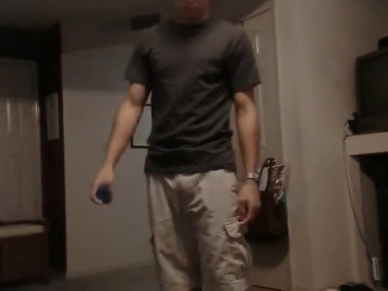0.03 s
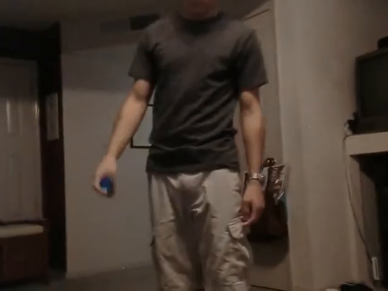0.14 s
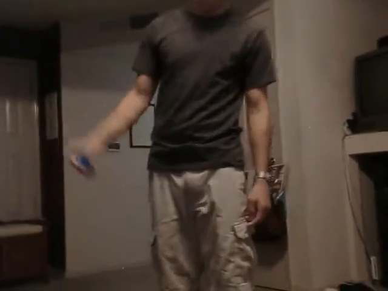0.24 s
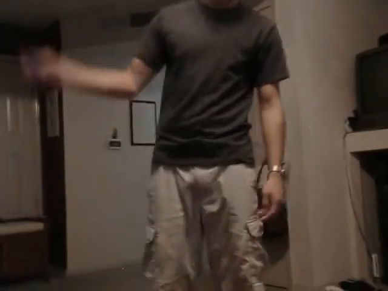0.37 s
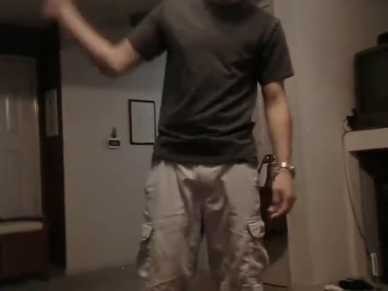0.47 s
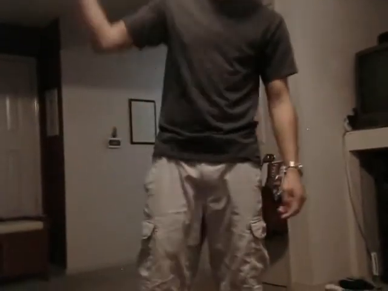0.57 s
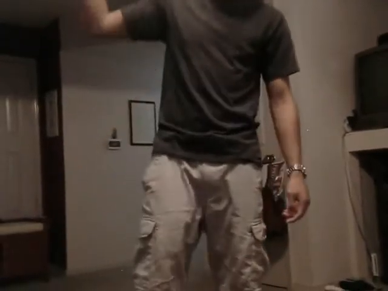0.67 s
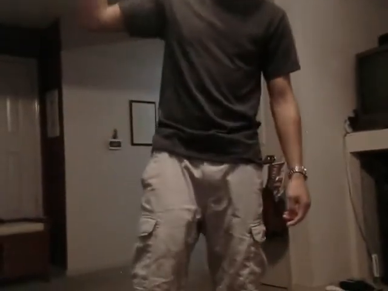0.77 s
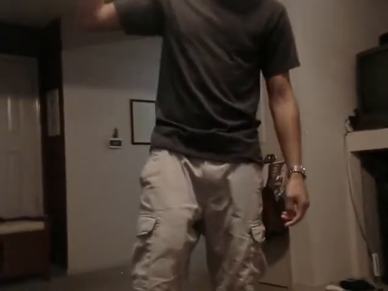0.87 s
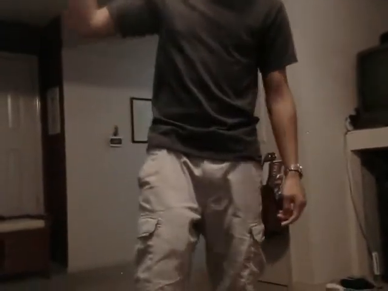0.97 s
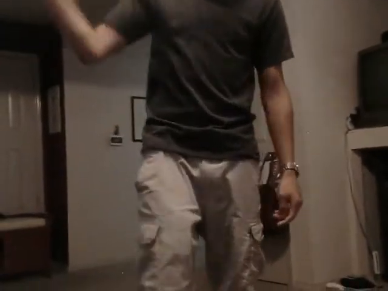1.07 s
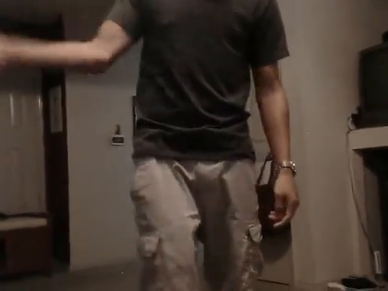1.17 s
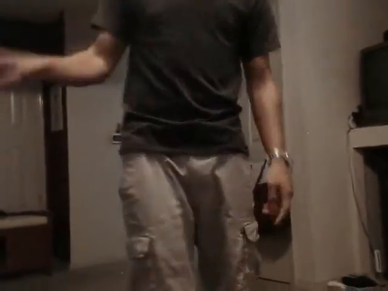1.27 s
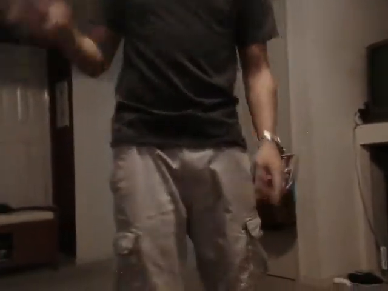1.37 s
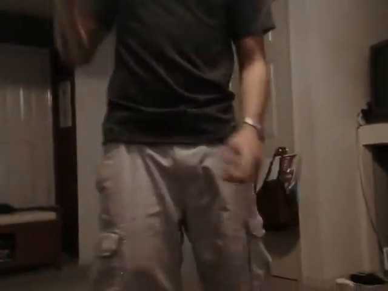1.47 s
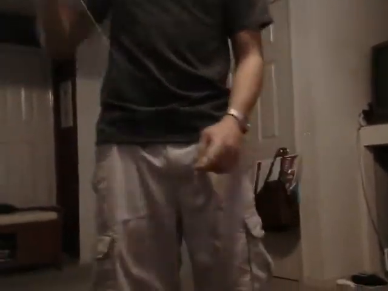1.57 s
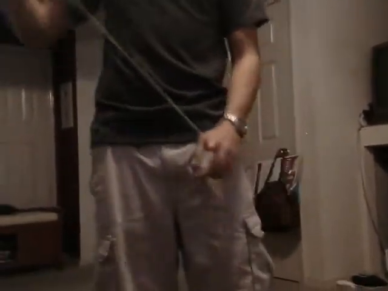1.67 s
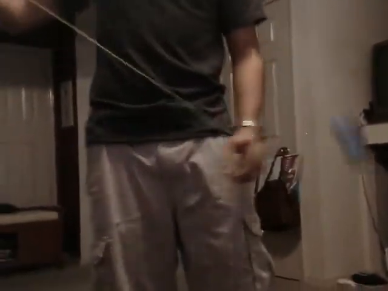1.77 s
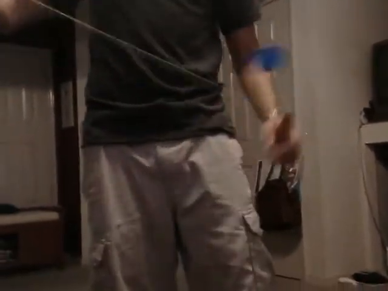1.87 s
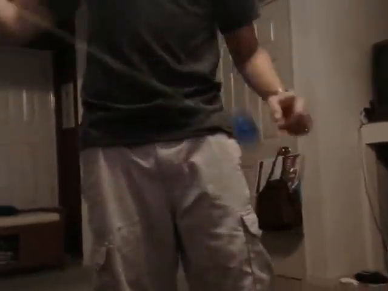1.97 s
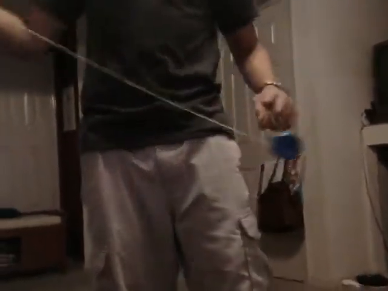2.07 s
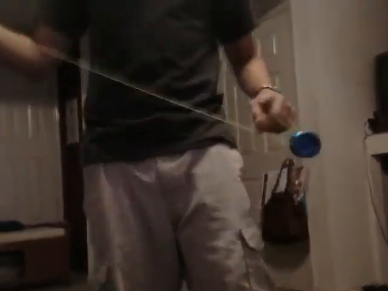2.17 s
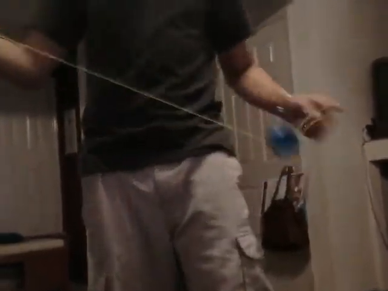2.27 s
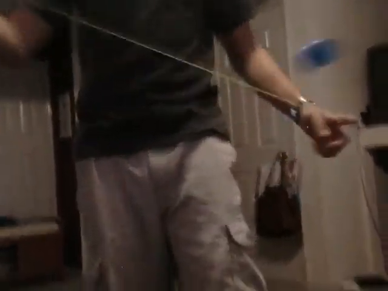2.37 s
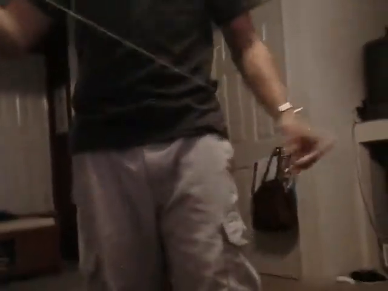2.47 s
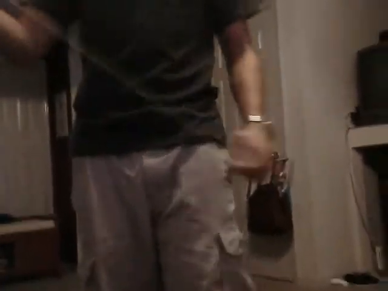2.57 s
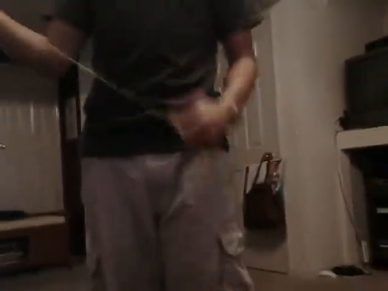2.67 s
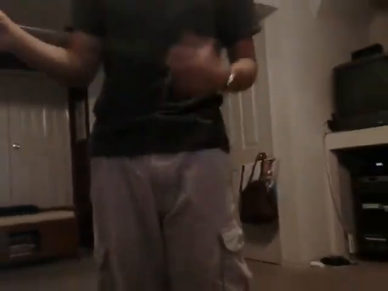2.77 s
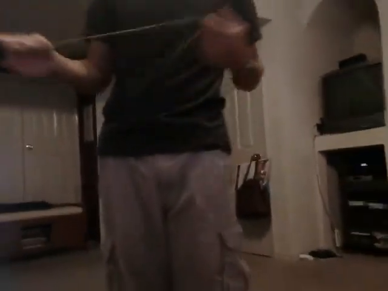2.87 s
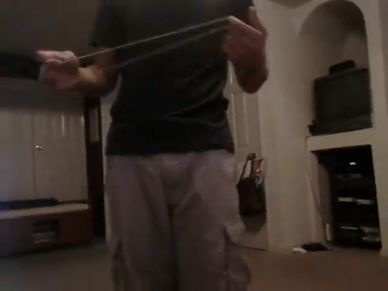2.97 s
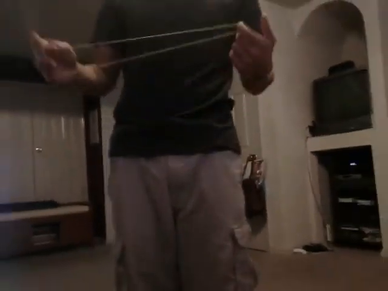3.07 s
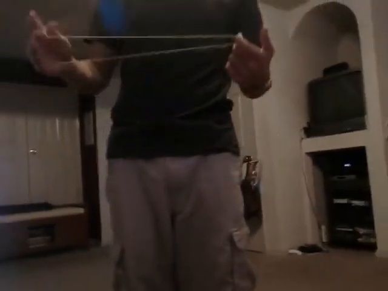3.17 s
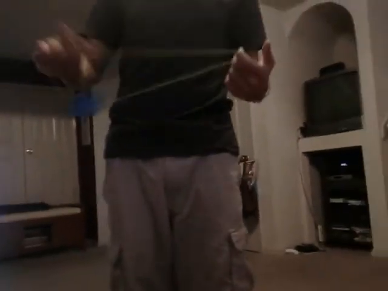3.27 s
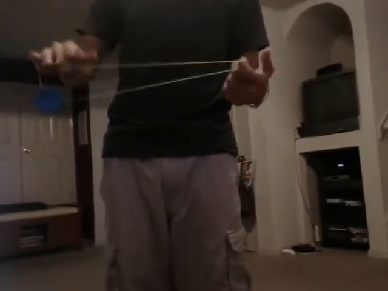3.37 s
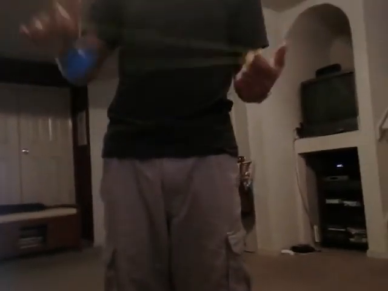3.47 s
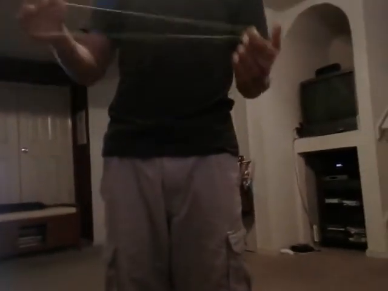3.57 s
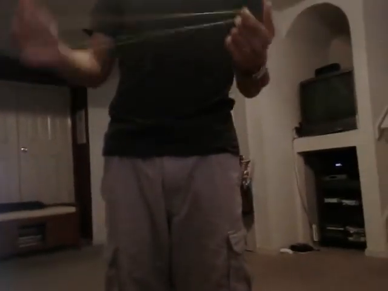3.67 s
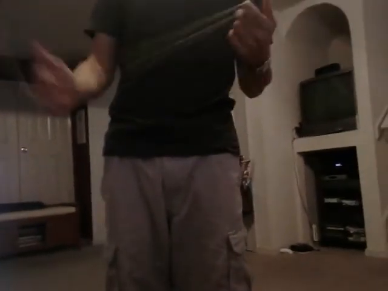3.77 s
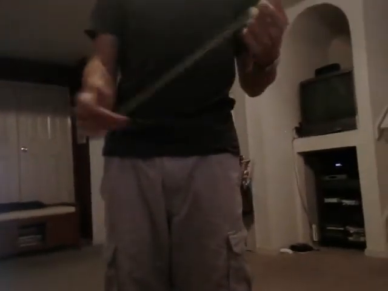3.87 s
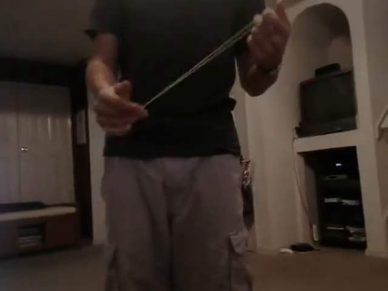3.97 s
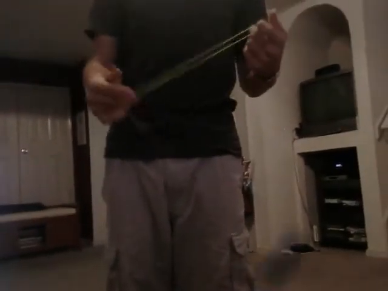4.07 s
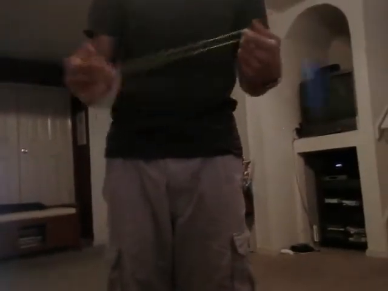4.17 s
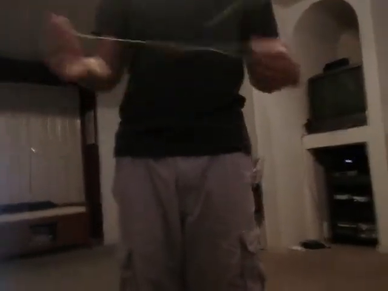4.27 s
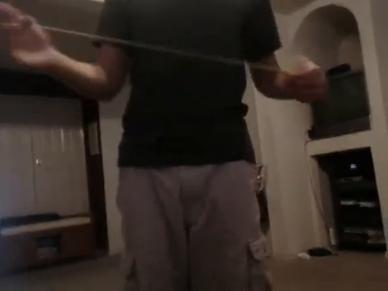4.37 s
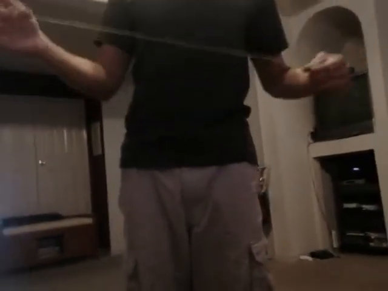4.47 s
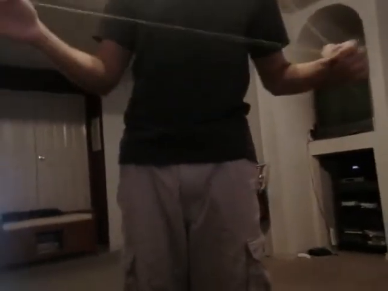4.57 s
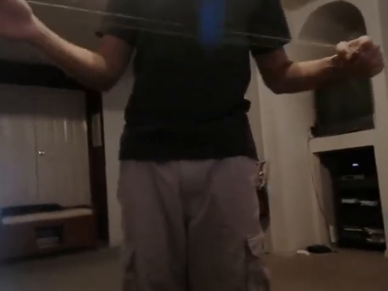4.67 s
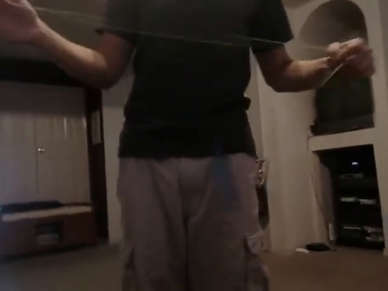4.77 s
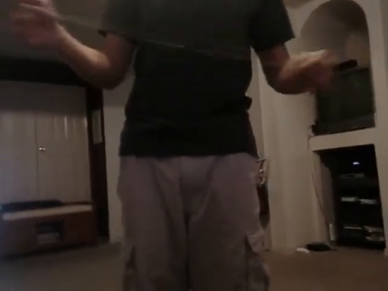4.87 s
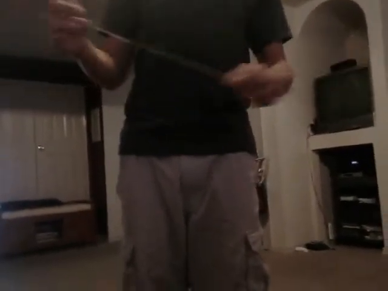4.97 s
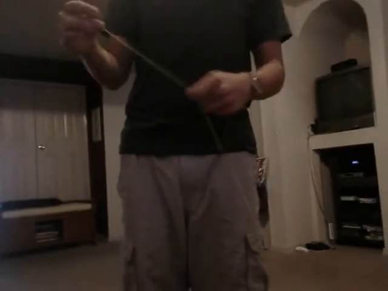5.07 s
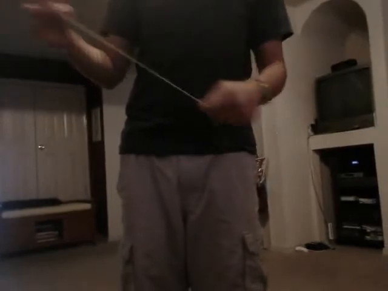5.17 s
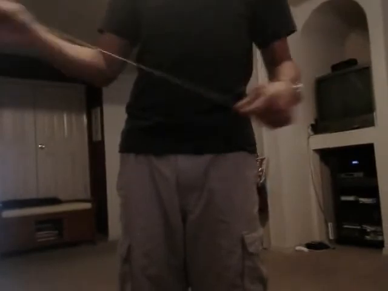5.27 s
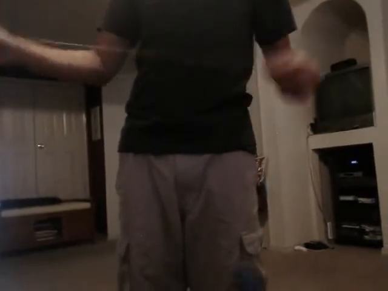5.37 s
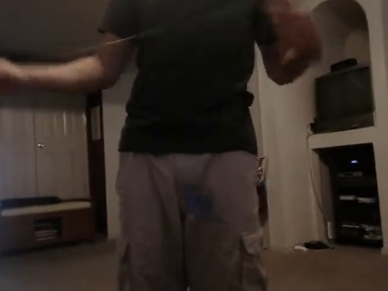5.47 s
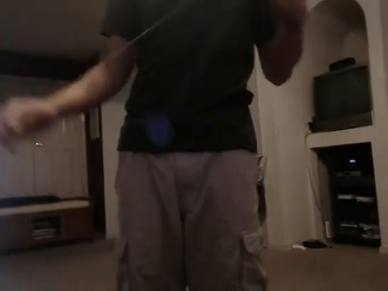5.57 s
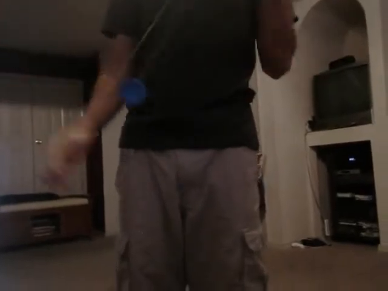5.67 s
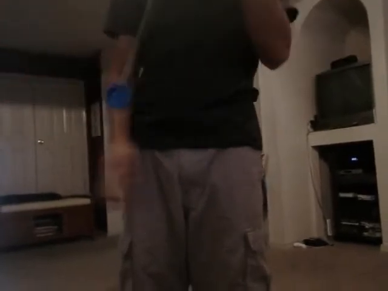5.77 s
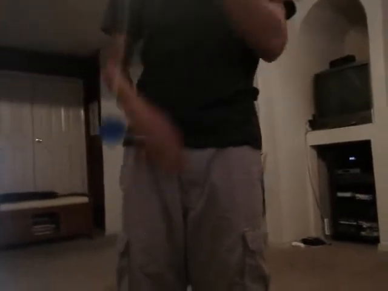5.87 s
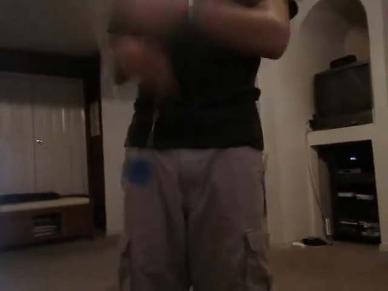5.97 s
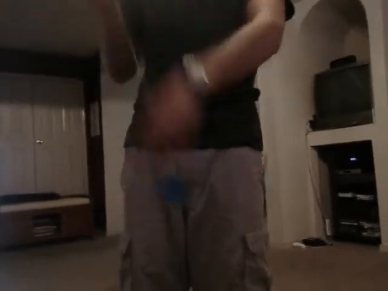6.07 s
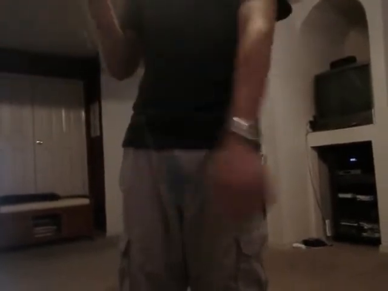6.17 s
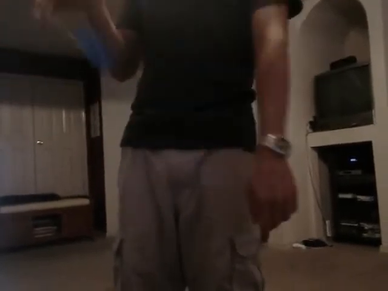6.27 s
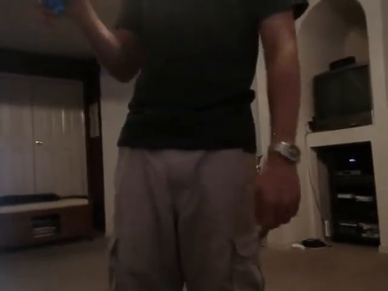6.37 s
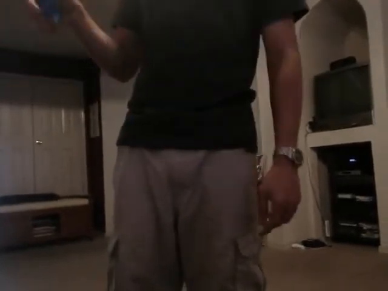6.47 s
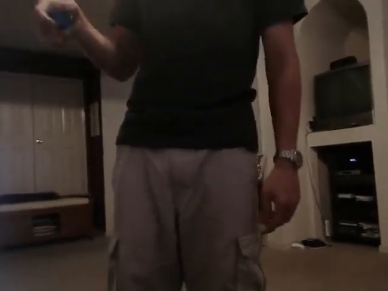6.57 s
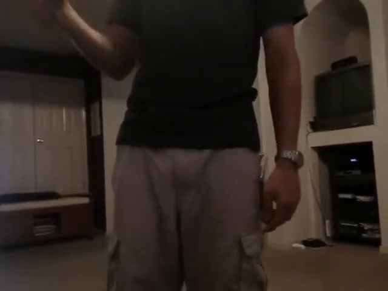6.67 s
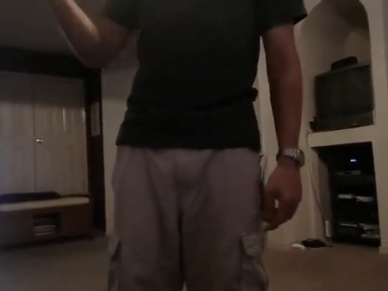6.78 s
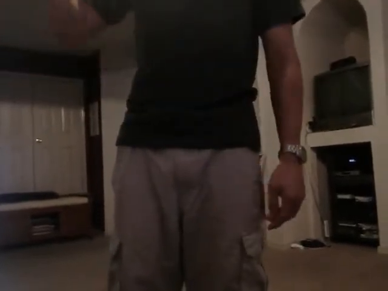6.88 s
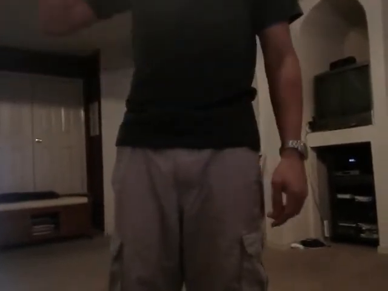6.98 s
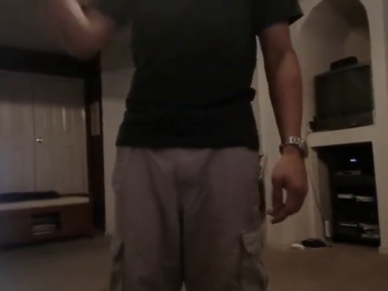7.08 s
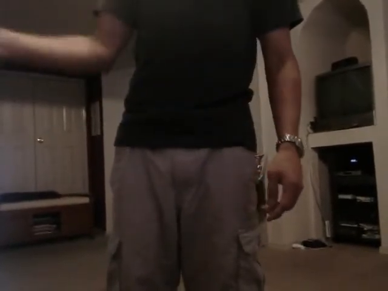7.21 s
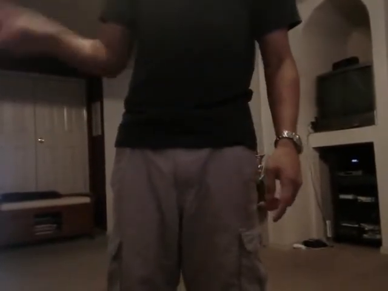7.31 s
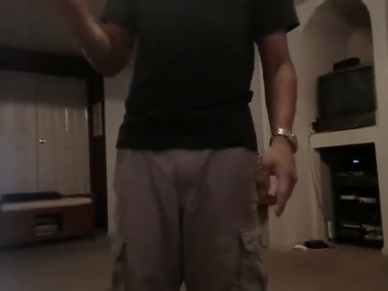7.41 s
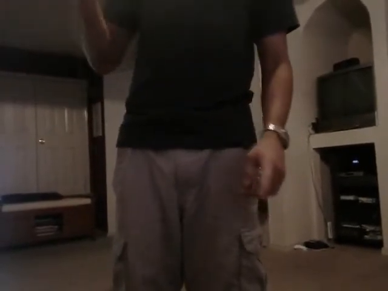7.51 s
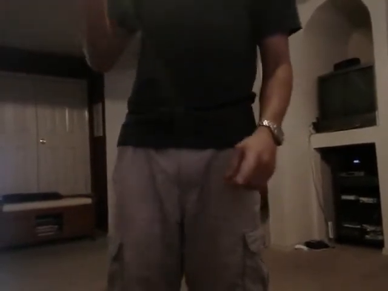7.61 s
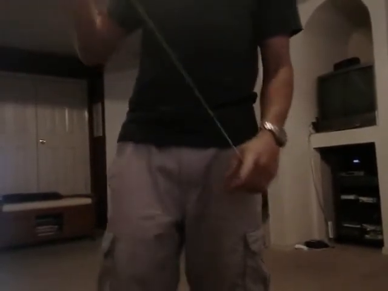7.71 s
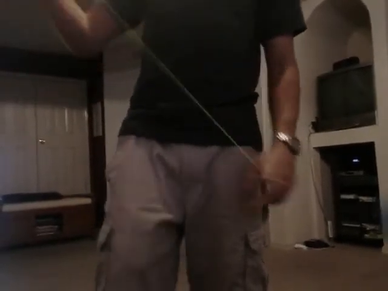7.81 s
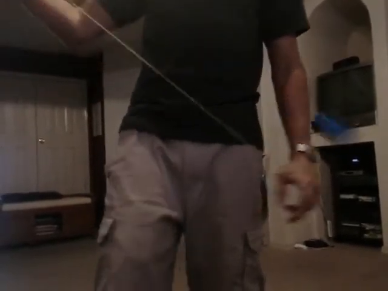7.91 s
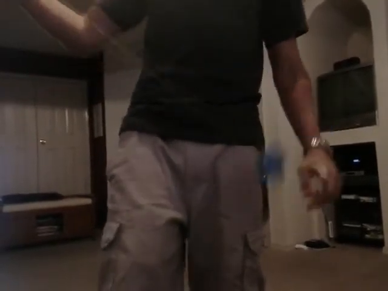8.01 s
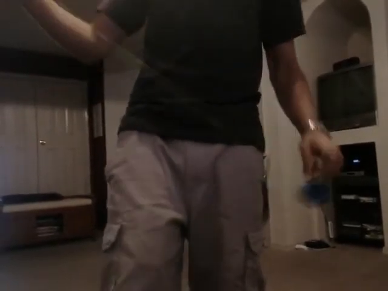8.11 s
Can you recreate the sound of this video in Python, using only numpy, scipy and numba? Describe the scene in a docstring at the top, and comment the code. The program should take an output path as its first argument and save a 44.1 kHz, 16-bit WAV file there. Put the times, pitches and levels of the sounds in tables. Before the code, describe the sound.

Thin whirring of a spinning yo-yo swells and fades indoors, with hissing string, scattered ticks, a snap and a slap.

```python
"""In a quiet carpeted room a metal yo-yo is thrown, spins on its string through swings and hops, is
wound back and thrown again. The ball bearing drives the two halves at their natural frequencies, and
vortices shed from the rims whir. The string hisses by friction, and ticks, slaps and snaps on impact.
Hand movements push puffs of air at a small mono microphone."""
import sys
import numpy as np
from scipy import signal
from scipy.fft import rfft, irfft
from scipy.io import wavfile
from numba import njit

SR = 44100
rng = np.random.default_rng(int(sys.argv[2]) if len(sys.argv) > 2 else 0)


def unload_wav(signal):
    """Save mono or channel-first audio to the path in sys.argv[1] as 16-bit WAV at rate SR, clipped to [-1, 1]."""
    wavfile.write(
        sys.argv[1],
        SR,
        np.round(np.clip(np.atleast_2d(signal).T, -1, 1) * 32767).astype(np.int16),
    )


N = 359318


def amp(db):
    return 10 ** (np.asarray(db) / 20)


def rms_one(x):
    return x / np.sqrt(np.mean(x ** 2) + 1e-20)


def in_time(rows):
    """Linear interpolation: one curve for each column after the time."""
    times, *columns = np.transpose(rows)
    return [np.interp(np.arange(N) / SR, times, column) for column in columns]


def gate(start, end, rise_db_per_s, fall_db_per_s):
    """Exponential growth up to start, unit gain until end, then exponential decay."""
    t = np.arange(N) / SR
    loss_db = rise_db_per_s * np.maximum(start - t, 0) + fall_db_per_s * np.maximum(t - end, 0)
    return amp(-np.minimum(loss_db, 200))


def drift(hz):
    """Low-pass noise: a slow random fluctuation of unit rms."""
    r = np.exp(-2 * np.pi * hz / SR)
    return rms_one(signal.lfilter([1], [1, -2 * r, r * r], rng.standard_normal(N + SR))[SR:])


def grains(per_s, spread_db):
    """Shot noise: random impulses of uneven size and sign, at unit rms."""
    sizes = amp(spread_db * np.minimum(rng.exponential(1, N), 5)) * rng.choice([-1, 1], N)
    return rms_one(sizes * (rng.random(N) < per_s / SR))


def ring(x, hz, t60):
    """Damped oscillator: a unit impulse excites a decaying sine of unit amplitude."""
    r, w = amp(-60 / (t60 * SR)), 2 * np.pi * min(hz, .45 * SR) / SR
    return signal.lfilter([0, np.sin(w)], [1, -2 * r * np.cos(w), r * r], x + 1e-18)


@njit
def glide(x, cosine, r):
    """Two-pole resonator with a variable centre frequency."""
    y = np.zeros(len(x))
    for i in range(2, len(x)):
        y[i] = x[i] - x[i - 2] + 2 * r * cosine[i] * y[i - 1] - r * r * y[i - 2]
    return y


def moving_band(x, hz, width_hz):
    """Two variable resonators in cascade give a band with steep skirts, at unit rms."""
    cosine, r = np.cos(2 * np.pi * hz / SR), np.exp(-np.pi * width_hz / SR)
    return rms_one(glide(glide(x, cosine, r), cosine, r))


def burst(s, db, ms, bands):
    """Transient response: a sharp front and a dying crackle excite a small radiator's resonances."""
    out, t, onset = np.zeros(N), np.arange(4000) / SR, round(s * SR)
    force = rng.standard_normal(len(t)) * np.exp(-(1000 * t / ms) ** 4)
    force[0] = 1.4
    drive = np.diff(force, prepend=0)   # a small source radiates little bass
    for hz, width_hz, band_db in bands:
        t60 = np.log(1000) / (np.pi * width_hz)
        sound = ring(ring(drive, hz, t60), hz, t60 / 2)
        out[onset:onset + len(t)] += amp(db + band_db) * sound[:N - onset] / np.abs(sound).max()
    return out


# Room tone and microphone self-noise: f/Hz, relative spectral level/dB
ROOM_SPECTRUM = [(12, -44), (20, -2), (42, -7.5), (70, -2.5), (113, -3), (208, -8), (283, -7.5),
                 (523, -14.5), (584, -16), (1210, -20), (3110, -25.5), (3890, -26.5), (15700, -29)]
def room_tone():
    """Spectrally shaped Gaussian noise, its lows slowly modulated in amplitude."""
    hz = np.arange(N // 2 + 1) * SR / N + 1
    knots_hz, knots_db = np.transpose(ROOM_SPECTRUM)
    shape = amp(np.interp(np.log(hz), np.log(knots_hz), knots_db))
    noise = rms_one(irfft(rfft(rng.standard_normal(N)) * shape, N))
    lows = signal.sosfilt(signal.butter(2, 90, fs=SR, output="sos"), noise)
    return amp(-49.5) * (noise + lows * (amp(3.5 * drift(1.4)) - 1))


# Air pushed by the hands: t/s, relative level/dB, half-height width/ms, sign (push +1, pull -1)
AIR_PUFFS = [(1.201, -42, 6.7, -1), (2.194, -39.5, 4.9, 1), (2.454, -44, 4.1, 1), (3.676, -43, 7.7, -1),
             (3.774, -41.5, 4.3, 1), (4.405, -38, 7.7, -1), (4.469, -35, 3.5, -1), (4.528, -42, 2, 1),
             (4.582, -37.5, 3.7, -1), (5.039, -41, 3.6, -1), (5.529, -39, 5.7, -1), (5.569, -46, 2.5, -1),
             (5.617, -39.5, 4.6, -1), (6.361, -41.5, 8.3, -1), (6.557, -39.5, 4.3, 1), (6.618, -32, 2.8, 1),
             (7.556, -44, 3.9, 1)]
def puffs():
    """Gaussian pressure pulses swing back as the microphone's vent equalises the pressure."""
    t, pressure = np.arange(N) / SR, np.zeros(N)
    for s, db, ms, sign in AIR_PUFFS:
        pressure += sign * amp(db + 6.5) * np.exp(-np.log(16) * (1000 * (t - s) / ms) ** 2)
    return signal.sosfilt(signal.butter(2, 25, "high", fs=SR, output="sos"), pressure)


# The string brushes a rim: t/s, peak level/dB, duration/ms
RIM_PINGS = [(4.675, -45.5, 30), (6.02, -48, 15), (6.322, -40, 7), (7.226, -47, 20), (7.252, -47, 3),
             (7.27, -46, 56), (7.985, -51, 30), (8.1, -57, 45)]
def pings():
    """Light contact excites one narrow, high resonance."""
    hz, width_hz = 8290, 100
    return sum(burst(s, db, ms, [(hz, width_hz, 0)]) for s, db, ms in RIM_PINGS)


# Thud resonances: f/Hz, bandwidth/Hz, gain/dB
THUD_BANDS, THUD_MS = [(596, 670, -0.48), (1480, 1000, -0.56)], 45
# The string jerks taut or the palm closes: t/s, level/dB
JERKS = [(1.412, -43.5), (6.119, -36.5)]
def thuds():
    """Sudden deceleration excites low, heavily damped resonances."""
    return sum(burst(s, db, THUD_MS, THUD_BANDS) for s, db in JERKS)


# Modes of the halves: f/Hz, T60/s, gain/dB when rolled, when dragged, when knocked
MODES = [(1452, 0.31, -6.5, -16, -32), (1580, 0.2, -4, -23, -25), (3548, 0.09, -29, -7.5, -21),
         (3560, 0.071, -16, -7, -13), (6744, 0.024, 4, -26, -22), (8350, 0.12, -28, -25, -32),
         (13000, 0.015, 3, -32, -30)]
def knocked_halves(contacts):
    """Free vibration: each impulse leaves the modes ringing."""
    knocks = np.zeros(N)
    for s, db, _, coupling_db in contacts:
        knocks[round(s * SR)] += amp(db + coupling_db)
    return sum(amp(db) * ring(knocks, hz, t60) for hz, t60, *_, db in MODES)


def dragged_halves(force):
    """Forced vibration: white noise of unit rms drives each mode to an rms set by its gain."""
    return sum(amp(db) * ring(force, hz, t60) * np.sqrt(4 * np.log(1000) / (t60 * SR))
               for hz, t60, _, db, _ in MODES)


# Ticks of string and fingers: t/s, peak level/dB, f/Hz, coupling to the halves/dB
STRING_TICKS = [(0.376, -41, 3700, -22), (1.1255, -40, 11000, 0), (1.1885, -34, 7000, -7),
                (1.224, -29, 5130, -10), (1.372, -46, 7000, -14), (2.166, -42, 4500, -22),
                (2.171, -31, 5000, -16), (2.2277, -27.5, 4000, -28), (2.25, -28, 12500, -17),
                (2.3033, -30.5, 2320, -24), (4.3615, -33.5, 1770, -24), (4.3719, -36.5, 3000, -22),
                (4.73, -32, 12100, -17), (5.42, -34, 13000, -8), (6.067, -35, 9000, 4),
                (6.11, -40, 7000, -15), (7.171, -38, 9050, -10), (7.193, -34, 9000, -12),
                (7.205, -36, 6600, -24), (7.2255, -33.5, 9900, -8), (7.2518, -32, 8500, -5),
                (7.305, -36, 9000, -8)]
def ticks():
    """Brief impacts radiate broadband clicks and knock the halves."""
    clicks = sum(burst(s, db, ms=1, bands=[(hz, 0.76 * hz, 0)]) for s, db, hz, _ in STRING_TICKS)
    return clicks + knocked_halves(STRING_TICKS)


# Slap resonances: f/Hz, bandwidth/Hz, gain/dB
SLAP_BANDS = [(1160, 1130, -8.5), (2920, 4100, 3), (8660, 9100, -4)]
# The yo-yo hits string or palm: t/s, level/dB, duration/ms, coupling to the halves/dB
SLAP_HITS = [(4.2614, -25, 1.4, -25), (4.2639, -17.5, 5.7, -26), (6.117, -33, 2.2, 5),
             (6.1265, -32, 2.1, 8.5), (6.3175, -36.5, 12, 5)]
def slaps():
    """Longer impacts crackle through three broad resonances and knock the halves."""
    return sum(burst(s, db, ms, SLAP_BANDS) for s, db, ms, _ in SLAP_HITS) + knocked_halves(SLAP_HITS)


# Snap resonances: f/Hz, bandwidth/Hz, gain/dB
SNAP_BANDS = [(6170, 3200, 0.4), (5200, 620, -23), (6550, 880, -19)]
def snap(s=3.6744, tail_lag_s=0.003):
    """Sudden release of tension: the string leaves a finger with an impulse and a short crackle."""
    crack = burst(s, db=-4, ms=.015, bands=SNAP_BANDS)
    return crack + burst(s + tail_lag_s, db=-17, ms=1.15, bands=[(4940, 6700, 0)])


# String winding on or off the axle: t/s, duration/s, drag level/dB, rustle level/dB
WINDS = [(1.125, .27, -58.5, -59), (1.23, 0.0072, -55.5, -55), (5.7, 0.084, -65, -64),
         (5.965, 0.065, -51, -50), (6.12, 0.0058, -41.5, -48), (6.206, 0.17, -62, -67),
         (7.115, 0.15, -63, -57.5), (7.308, 0.066, -58.5, -58), (7.93, 0.17, -59, -58)]
def winding():
    """Stick-slip friction on the inner walls makes the halves whine and the fibres rustle."""
    gates = np.array([gate(s, s + length, rise_db_per_s=700, fall_db_per_s=247)
                      for s, length, *_ in WINDS])
    *_, drag_db, rustle_db = np.transpose(WINDS)
    slips = grains(4000, spread_db=2.2) * amp(2.5 * drift(45))
    rustle = moving_band(slips, np.full(N, 8000.), width_hz=9500)
    return dragged_halves(amp(drag_db) @ gates * slips) + amp(rustle_db) @ gates * rustle


# Free spins: start t/s, end t/s, song level/dB, hum level/dB, gap whistle re upper whir band/dB
FREE_SPINS = [(1.374, 4.23, -60.0, -66.5, -9.5), (4.3, 6.0, -59.5, -69, -20), (7.4, 8.2, -59.5, -64.0, -6)]
def spinning(levels_db=0):
    """Amplitude envelope that opens for each free spin, at that spin's level."""
    gates = [gate(start, end, rise_db_per_s=300, fall_db_per_s=250) for start, end, *_ in FREE_SPINS]
    return np.sum(amp(levels_db) * np.transpose(gates), axis=1)


# String running over axle and fingers: t/s, level/dB, f/Hz
STRING_RUB = [(1.33, -65, 7950), (1.37, -62, 7660), (1.45, -56.5, 9100), (2.81, -59.5, 8200),
              (2.88, -55.5, 9800), (2.99, -59.5, 7600), (3.4, -51, 9700), (3.65, -57, 9400),
              (3.71, -55, 8500), (4.228, -59, 8500), (4.245, -71, 8400), (4.295, -66, 8130),
              (4.439, -55.5, 8550), (4.613, -62.5, 7900), (4.795, -52, 9750), (5.085, -61.5, 9530),
              (5.199, -55.5, 10000), (5.487, -54.5, 8920), (5.695, -59.5, 8700), (5.909, -50, 8600),
              (5.973, -66, 8340), (6.08, -49, 9140), (7.36, -65, 8300), (7.534, -59, 9060),
              (7.732, -59.5, 8410), (7.758, -57.5, 9550), (8.148, -55.5, 8200)]
def string_hiss():
    """Sliding friction: catching fibres give a bright band of noise over a broad rustle."""
    hiss_db, hiss_hz = in_time(STRING_RUB)
    fibres = grains(6000, spread_db=2.5) * amp(1.6 * drift(26))
    bright = moving_band(fibres, hiss_hz, width_hz=3600)
    rustle = amp(0.5) * rms_one(signal.lfilter([1, 0, -1], [1, -.5], fibres))
    return spinning() * amp(hiss_db) * (bright + rustle)


# Air past the rims as the yo-yo swings: t/s, lower band level/dB, upper band re lower/dB
WHIR = [(1.33, -70, -9), (1.39, -69, -1), (1.41, -53.5, 0), (1.57, -58, -6), (1.63, -47, -4.5),
        (1.81, -58, -2), (1.92, -45, 1), (2.03, -50, 0.5), (2.17, -62, -3), (2.3, -42.5, -7),
        (2.41, -53, 5.5), (2.81, -49.5, -5.5), (2.93, -50, -3), (2.97, -65, 12), (2.99, -57, 7),
        (3.15, -56, 6), (3.27, -43.5, -6), (3.33, -51, -19), (3.45, -45, -14), (3.65, -54.5, 3),
        (3.71, -59, 3), (3.93, -48, -4), (3.97, -54.5, 5), (4.168, -47.5, -0.5), (4.245, -60, -1),
        (4.295, -68, 2), (4.477, -62, 0), (4.533, -71, -1), (4.687, -67, 0), (4.751, -46, -4),
        (4.851, -52, -1), (4.969, -46, 2), (4.985, -56, 5), (5.467, -52, -2), (5.671, -60, -6),
        (5.943, -52.5, -5), (6.053, -75, -3), (6.08, -63, -3), (7.36, -76, -6), (7.414, -57.5, -7),
        (7.7, -44, -12.5), (7.848, -53.5, -3), (7.94, -44.5, -1), (7.956, -57, 5), (7.974, -42, -8),
        (8.008, -48, -5), (8.148, -44.5, -9)]
def rim_whir(lower_hz=12090, upper_hz=14160):
    """Vortex shedding: each rim gives a narrow band of noise whose centre wanders."""
    lower_db, tilt_db = in_time(WHIR)
    eddies = [grains(8000, spread_db=4.5) * amp(1.3 * drift(37)) for rim in range(2)]
    lower = moving_band(eddies[0], lower_hz * amp(0.32 * drift(19)), width_hz=940)
    upper = moving_band(eddies[1], upper_hz * amp(0.17 * drift(25)), width_hz=990)
    return spinning() * (amp(lower_db) * lower + amp(lower_db + tilt_db) * upper)


def bearing_song(turns_per_s=60, reference_whir_db=-52):
    """Forced resonance: balls rolling over tiny flaws set the halves singing, and the gap whistles."""
    lower_db, tilt_db = in_time(WHIR)
    swell_db = lower_db + tilt_db / 2 - reference_whir_db
    *_, song_db, hum_db, gap_db = np.transpose(FREE_SPINS)
    # The low modes waver on their own; the middle ones swell with the whir, the top one more so.
    hum_gain = spinning(hum_db) * amp(5.5 * drift(3.8))
    middle_gain = spinning(song_db) * amp(0.3 * swell_db + 1.5 * drift(10.4))
    top_gain = spinning(-52) * amp(0.7 * swell_db)
    turn = np.sin(2 * np.pi * turns_per_s * np.cumsum(1 + 0.099 * drift(3.3)) / SR)
    rolling = grains(4000, spread_db=3.0) * amp(turn + 1.37 * drift(20))   # harder once a turn
    song = 0
    for hz, t60, rolled_db, *_ in MODES:
        gain = hum_gain if hz < 2000 else top_gain if hz > 10000 else middle_gain
        song += gain * amp(rolled_db) * rms_one(ring(rolling, hz, t60))
    gap_gain = spinning(gap_db) * amp(lower_db + tilt_db + 3 * drift(7.0))
    gap_hz = 2840 + 21 * swell_db   # faster air whistles higher
    return song + gap_gain * moving_band(rolling, gap_hz, width_hz=900)


def scene():
    """Superposition of all sources, identical in both channels."""
    sustained = bearing_song() + rim_whir() + string_hiss() + winding()
    impacts = ticks() + slaps() + thuds() + pings() + snap()
    return np.tile(sustained + impacts + puffs() + room_tone(), (2, 1))


def record(dry):
    """Band limiting: a steep elliptic low-pass removes the highest treble."""
    return signal.sosfilt(signal.ellip(12, .5, 60, 15720, fs=SR, output="sos"), dry)


dry = scene()
out = record(dry)
unload_wav(out)
```